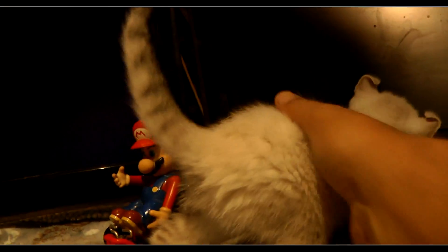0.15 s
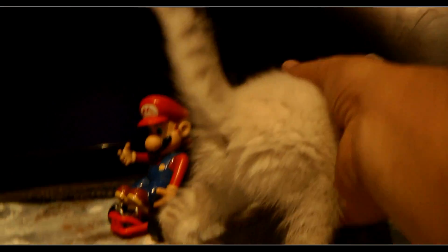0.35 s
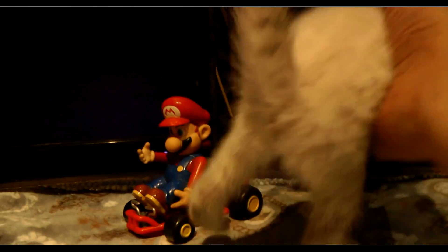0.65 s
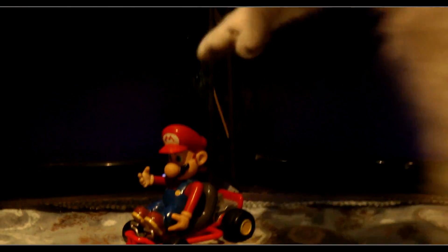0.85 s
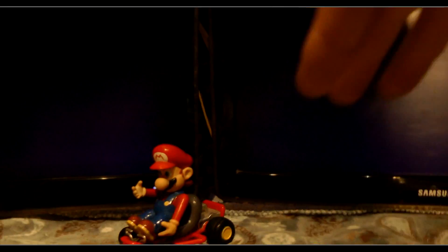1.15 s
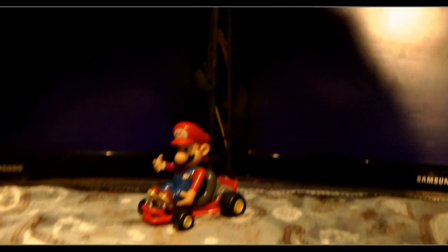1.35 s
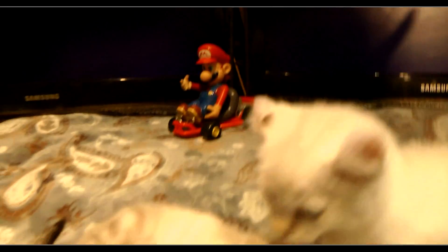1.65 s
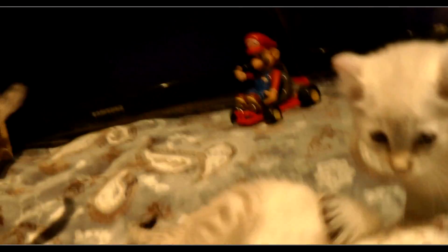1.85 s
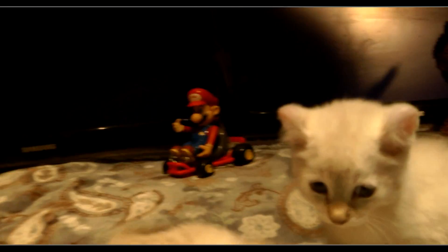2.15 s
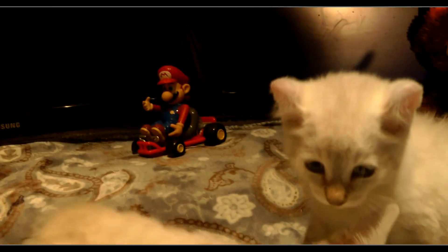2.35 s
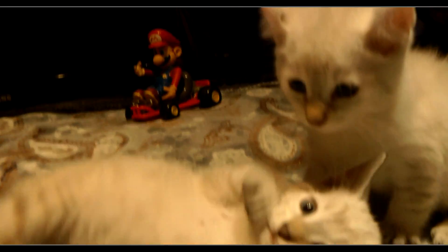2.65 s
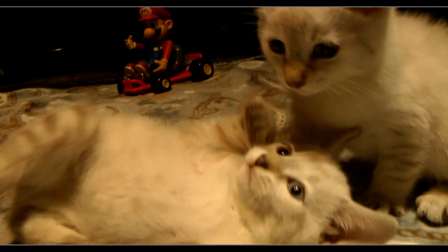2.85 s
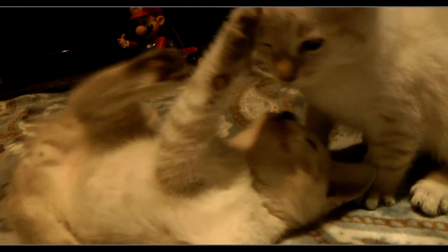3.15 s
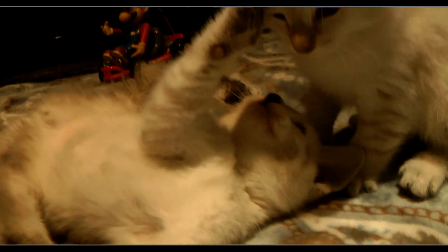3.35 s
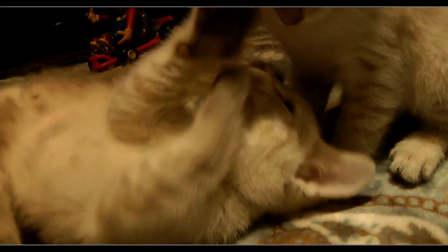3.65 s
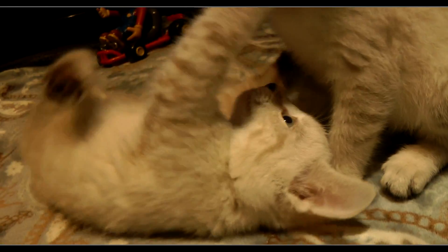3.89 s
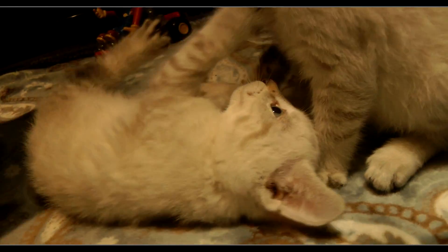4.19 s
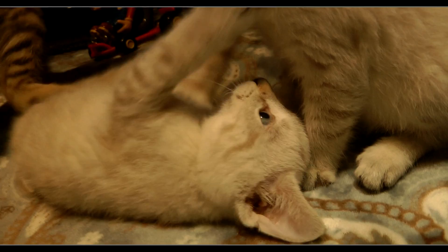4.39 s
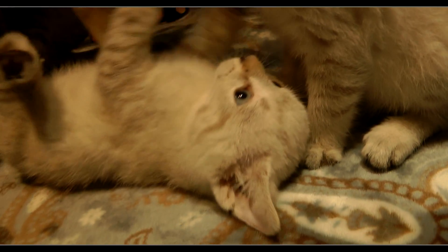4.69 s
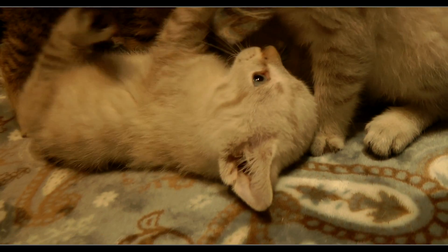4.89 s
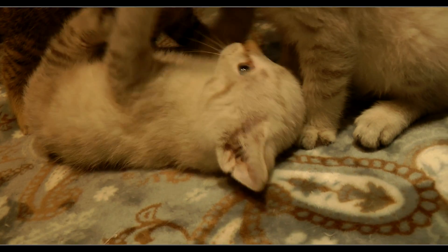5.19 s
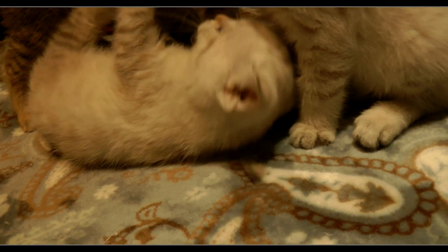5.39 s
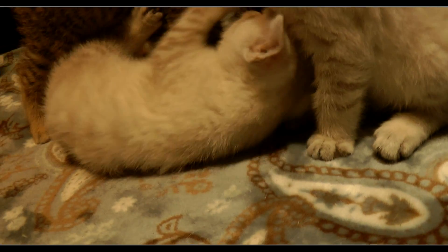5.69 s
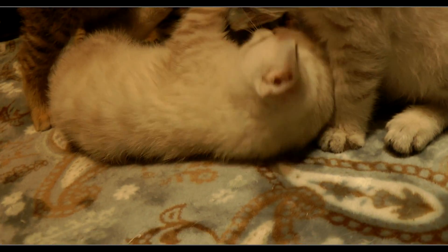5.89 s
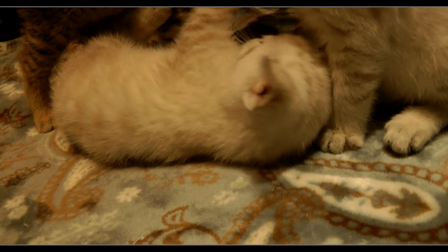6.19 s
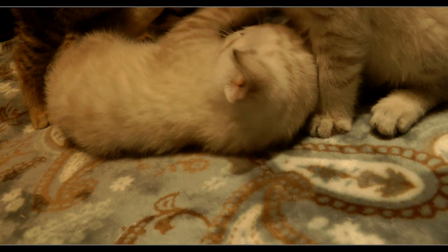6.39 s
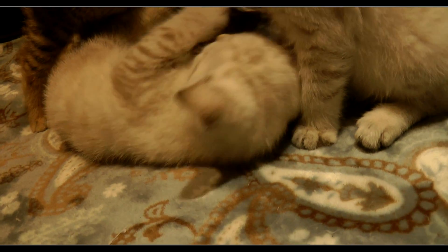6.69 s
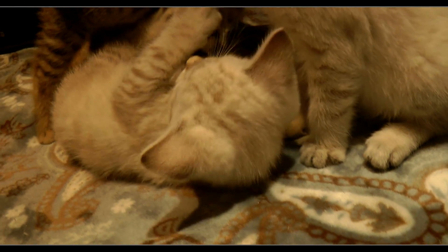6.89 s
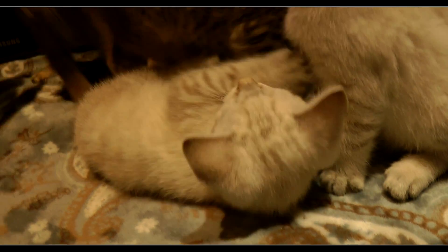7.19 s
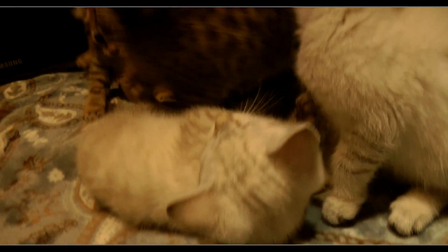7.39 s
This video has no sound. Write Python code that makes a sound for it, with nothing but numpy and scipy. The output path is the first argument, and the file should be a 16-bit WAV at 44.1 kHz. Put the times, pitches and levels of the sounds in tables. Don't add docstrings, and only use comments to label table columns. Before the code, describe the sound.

Kittens tumble on a soft bed cover. Light bumps of fingers on the device, a heavy low thud and quick hollow taps open it; then fur drags and rustles over cloth with padded shoves. Quieter scuffs lead to a sudden loud pat with claws catching threads, smaller thumps, and a final bright scratchy flurry. The stereo is wide and phasey, with low room hiss.

```python
import sys
import numpy as np
from scipy import signal
from scipy.fft import rfft, irfft, next_fast_len
from scipy.io import wavfile
from scipy.ndimage import uniform_filter1d

SR = 44100
rng = np.random.default_rng(int(sys.argv[2]) if len(sys.argv) > 2 else 0)


def gain_from_db(level_db):
    decades = np.asarray(level_db, float) / 20
    return 10 ** decades


def generate_wav(signal):
    frames = np.transpose(np.atleast_2d(signal))
    scaled = np.clip(frames, -1, 1) * 32767
    pcm = np.round(scaled).astype(np.int16)
    wavfile.write(sys.argv[1], SR, pcm)


N = 332514
T = np.arange(N) / SR


def unit(x):
    return x / np.sqrt(np.mean(x ** 2))


def band(x, lo_hz, hi_hz, order=2):
    return signal.sosfilt(signal.butter(order, [lo_hz, hi_hz], "band", fs=SR, output="sos"), x)


def low(x, hz):
    return signal.sosfiltfilt(signal.ellip(8, .2, 40, hz, fs=SR, output="sos"), x)


def walk(rate_hz):
    hold = int(SR / rate_hz)
    levels = rng.standard_normal(N // hold + 1)
    return uniform_filter1d(np.repeat(levels, hold), hold)[:N]


def add(out, start_s, x, peak_db):
    i = int(start_s * SR)
    x = x[:N - i]
    out[i:i + len(x)] += gain_from_db(peak_db) * x / np.max(np.abs(x))


def blow(hz, width, t60_s, rise_s, rough, size, snap=0.):
    t = np.arange(size) / SR
    attack = 1 - np.exp(-t / rise_s)
    decay = np.exp(-np.log(1000) * t / max(t60_s, .01))
    envelope = attack * decay * (1 + snap * np.exp(-t / 0.0017))
    wobble = unit(band(rng.standard_normal(size), hz / (1 + width), hz * (1 + width)))
    return envelope * (np.sin(2 * np.pi * hz * t) + rough * wobble)


def room_tone():
    # (relative, per Hz)
    hiss_spectrum = [(15, -45), (25, -7), (71, -10.5), (178, -2.5), (250, -2.5), (325, -2.5), (370, -4),
                     (494, -5.5), (548, -5), (609, -4), (1000, -4.5), (1300, -7), (1560, -8), (10800, -19),
                     (13000, -24.5)]
    # frequency_hz, level_db
    fan_lines = [
        (1018, -72),
        (180, -85),
    ]
    hz, db = np.transpose(hiss_spectrum)
    shape = gain_from_db(np.interp(np.log(np.fft.rfftfreq(N, 1 / SR) + 1), np.log(hz), db))
    waver = gain_from_db(.6 * walk(3))
    hiss = unit(irfft(rfft(rng.standard_normal(N)) * shape, N)) * gain_from_db(-54.5) * waver
    cavity = unit(band(rng.standard_normal(N), 4650, 7640)) * gain_from_db(-64.5)
    fan = sum(gain_from_db(db + 3.9 * walk(3.16)) * np.sin(2 * np.pi * f * T) for f, db in fan_lines)
    return hiss + cavity + fan


def creaks():
    # start_s, length_s, pitch_hz, level_db
    frame_creaks = [
        (4.62, .42, 400, -60.5),
    ]
    out = np.zeros(N)
    for start_s, length_s, hz, db in frame_creaks:
        n = int(length_s * SR)
        friction = band(rng.standard_normal(n), 0.91 * hz, 1.05 * hz)
        add(out, start_s, friction * np.sqrt(np.hanning(n)), db + 9.0)
    return out


def motion():
    # start_s, cloth_db
    restlessness = [(0, -56), (.57, -60), (1.3, -61), (1.95, -58.5), (2.4, -56.5), (2.56, -53.5),
                    (3.0, -52.5), (3.36, -46.5), (3.63, -48.5), (3.95, -52), (4.2, -52), (4.45, -57.5),
                    (4.75, -52), (5.02, -58), (5.7, -59), (6.0, -53.5), (6.55, -51), (6.95, -61)]
    # start_s, length_s, level_db, brightness_db, mattress_weight_db
    fur_drags = [(3.256, 0.053, -48, -0.5, -4), (4.49, 0.036, -48.5, -4, -11), (1.303, 0.11, -70, -12, 8),
                 (1.6, 0.076, -50.5, 5.5, -20), (1.721, 0.055, -49, 11, -5.5), (1.828, 0.07, -49.5, 2, -10),
                 (3.032, 0.13, -48, -3.5, -20), (3.153, 0.11, -40, -2.5, -12), (3.435, 0.093, -50.5, 0, -6),
                 (3.635, 0.048, -57.5, 8.5, -14), (3.967, 0.049, -46.5, -5.5, -26),
                 (4.206, 0.022, -60, 12, -18), (4.546, .05, -61.5, 8.5, 0), (4.825, .03, -61, 13, -15),
                 (4.913, 0.024, -49.5, 3.5, -4), (5.205, 0.08, -51, 7, 1), (5.659, 0.015, -53.5, 8, -9),
                 (5.8, 0.092, -53, 14.5, 6), (5.78, .015, -52, 11, 0), (5.943, 0.056, -45, -5, -7),
                 (6.635, 0.1, -51, -7, -1), (6.765, 0.025, -52, 4.5, 5), (7.267, 0.016, -57, 17.5, -4),
                 (7.346, 0.13, -62.5, 12, 1.5), (7.482, .05, -59, -2, -4)]
    attack_s, release_s = 0.018, 0.026
    t = T[::44]
    offsets_db = np.array([[0], [-8], [-10.5]])
    power = gain_from_db(np.interp(t, *np.transpose(restlessness)) + offsets_db) ** 2
    for start_s, length_s, db, bright_db, weight_db in fur_drags:
        swell = np.clip((t - start_s) / attack_s, 0, 1)
        release = np.exp(-np.clip(t - start_s - length_s, 0, None) / release_s)
        levels = gain_from_db(db + np.array([[0], [bright_db], [weight_db]]))
        power = power + (levels * swell * release) ** 2
    return [np.interp(T, t, np.sqrt(p)) for p in power]


def rustle(close):
    body, bright, weight = motion()
    chance = rng.random((2, N))
    happens = chance[0] < 2500 / SR
    size = gain_from_db(1.6 * -np.log(chance[1] + 0.018))
    slips = happens * size * np.sign(rng.standard_normal(N))
    slips = (unit(slips) + 0.82 * rng.standard_normal(N)) * gain_from_db(2.6 * walk(40))
    cloth = unit(band(slips, 307, 2300)) * body * gain_from_db(-3.0)
    fibres = (1 - close) * unit(band(slips, 3200, 6000, order=1)) * bright * gain_from_db(-2.5)
    press = unit(band(rng.standard_normal(N), 110, 288)) * weight * gain_from_db(1.04 * walk(15))
    skin = close * unit(band(slips, 3460, 10600)) * bright * gain_from_db(-4.5)
    return cloth + fibres + skin + press


def thumps():
    # start_s, peak_db, pitch_hz, t60_s
    body_drops = [(.539, -54, 131.5, 0.55), (1.202, -15.5, 180.4, 0.053), (1.221, -24, 180, 0.09),
                  (1.203, -32.5, 99, 0.16), (1.204, -29, 310, .05), (4.82, -38, 87, .15),
                  (7.3, -48, 72, .2), (3.73, -47, 340, 0.055), (3.766, -46, 250, .06),
                  (1.281, -37, 128, 0.27), (1.618, -50, 92, 0.085), (1.744, -41.5, 110, 0.15),
                  (2.04, -58, 183, 0.17), (3.49, -41, 257, 0.28), (3.859, -41, 126, 0.075),
                  (3.981, -33.5, 180.4, 0.16), (4.562, -45, 127, 0.12), (4.815, -30, 128, 0.11),
                  (6.514, -36.5, 181, 0.25), (3.983, -28.5, 486, 0.055), (6.519, -27.5, 486, 0.099),
                  (1.204, -28, 595, 0.04)]
    # start_s, peak_db, pitch_hz, padding_db
    limb_shoves = [(.059, -52, 182, 9), (.618, -49, 251, 4.5), (0.807, -53, 260, 0),
                   (1.835, -48.5, 253, 8.5), (2.498, -44.5, 139, 10.5), (3.159, -34.5, 257, 8),
                   (3.221, -33.5, 245, -2), (3.379, -47, 267, 2), (3.613, -38.5, 263, -0.5),
                   (3.819, -42, 218, 5.5), (5.221, -48, 145, -12), (5.768, -29, 122, 4.5),
                   (5.855, -32, 121.5, 9.5), (5.883, -32.5, 251, 10.5), (5.95, -44, 154, 9.5),
                   (6.363, -51.5, 247, 10), (6.679, -55, 260, -4), (6.695, -43.5, 133, -3),
                   (6.792, -46, 190, 6.5), (7.236, -41.5, 102, 2), (7.276, -37, 123, 10.5),
                   (7.339, -54, 180, 25), (.28, -54, 121, -8)]
    drop_padding_db, shove_t60_s = -25, 0.16
    weights = [(s, db, hz, drop_padding_db, t60_s) for s, db, hz, t60_s in body_drops]
    weights += [(*row, shove_t60_s) for row in limb_shoves]
    out = np.zeros(N)
    for start_s, db, hz, padding_db, t60_s in weights:
        mattress = blow(hz, 0.51, t60_s, min(0.0072, 0.07 * t60_s), 0.36, size=16000)
        add(out, start_s, mattress, db + 1.5)
        add(out, start_s, blow(75., .3, 1.1 * t60_s, .008, 1.5, size=16000), db - 22)
        padding = blow(341.5, 0.84, 0.54 * t60_s, 0.0016, 2.1, size=16000)
        add(out, start_s + 0.002944, padding, db + padding_db)
    return out


def ticks():
    # start_s, peak_db, pitch_hz, t60_s
    claw_ticks = [(3.1625, -30, 2100, 0.028), (3.1625, -34.5, 5200, .03), (3.331, -41, 1900, .03),
                  (3.981, -39, 1650, .03), (5.814, -31, 5600, .04), (5.8287, -23.5, 2800, .03),
                  (5.956, -27, 1500, 0.022), (6.666, -39, 1600, .03), (6.519, -36.5, 1970, 0.018),
                  (5.837, -26, 2200, .03), (5.852, -24, 1680, .03), (5.904, -33, 920, 0.028),
                  (5.964, -32, 2900, 0.027), (5.964, -35, 6000, .03), (7.29, -32, 3650, .025),
                  (7.29, -36, 7200, .025), (7.338, -22.5, 5100, .03), (7.339, -31, 6300, 0.028),
                  (7.342, -18, 2620, .03), (7.359, -32, 2400, .02), (7.3745, -23.5, 3300, .03),
                  (7.367, -38, 9000, 0.018), (7.29, -42, 10500, .02), (7.383, -36, 2000, .03),
                  (1.299, -50, 7400, .03)]
    out = np.zeros(N)
    for start_s, db, hz, t60_s in claw_ticks:
        add(out, start_s, blow(hz, 0.13, t60_s, 0.0005, 1.13, size=2500), db)
    return out


def taps():
    # start_s, peak_db, pitch_hz, crack_db
    pats = [(.062, -50, 492, -13), (.292, -31.5, 900, -37), (.542, -39, 862, -4.5), (.625, -31, 666, -14),
            (.819, -47, 520, -17), (1.212, -36, 678, -20), (1.746, -26, 1400, -20), (1.737, -33, 1400, -14),
            (1.791, -32.5, 893, -12), (1.633, -35, 595, -15), (1.845, -31, 1300, -20),
            (1.616, -38, 1210, -20), (1.75, -20.5, 780, -33), (1.758, -21.5, 1400, -18),
            (1.83, -17.5, 1450, -27), (2.498, -34, 707, -9.5), (2.519, -36, 1220, -5.5),
            (2.652, -45, 503, -15), (3.329, -41, 1050, -7), (3.383, -36.5, 475, -12),
            (3.491, -28.5, 560, -10), (3.5, -34, 1090, -10), (3.916, -33, 1230, -15),
            (3.921, -34.5, 724, -16), (3.984, -36, 526, -7), (4.812, -29, 960, -10),
            (5.764, -19, 1025, -14), (5.757, -36, 1500, -1), (5.77, -10.5, 746, -22),
            (5.771, -17, 1090, -20), (6.371, -46, 440, -15), (6.548, -36, 466, -18), (6.558, -34, 850, -15),
            (6.663, -36, 462, -9), (7.27, -26.5, 1950, -5), (7.274, -19.5, 975, -8.5),
            (7.342, -16, 990, -9), (5.773, -18, 590, -23)]
    # start_s, peak_db, pitch_hz, crack_db
    skids = [(.619, -43, 1090, 3.5), (1.214, -40, 460, -2.5), (1.632, -24, 1250, -9),
             (1.735, -38, 1410, -9), (1.782, -31, 1430, -7), (1.831, -23.5, 570, -26),
             (2.015, -50, 1440, -18), (2.046, -44, 742, -14), (3.162, -26.5, 386, -3),
             (3.17, -25.5, 1122, -3), (3.259, -34.5, 687, -1), (3.609, -34.5, 710, -3),
             (3.819, -37.5, 520, -9), (5.79, -25, 1240, -14), (5.83, -26, 690, -1), (5.853, -17.5, 740, -7),
             (5.861, -26, 900, -5), (5.883, -19.5, 742, -7), (5.894, -30, 900, -4),
             (5.956, -24.5, 1500, -5.5), (6.517, -30, 555, -11), (6.634, -40, 614, -9),
             (6.688, -38, 580, -25), (6.781, -35, 394, -16), (6.793, -38.5, 500, -0.5),
             (7.232, -35, 1085, -6), (7.289, -32, 810, -2), (7.338, -18, 1070, -3),
             (7.3375, -17.5, 1640, -3), (7.3675, -21, 950, -3)]
    # start_s, peak_db, pitch_hz, crack_db, scratch_db
    swipes = [(0.212, -47.5, 503, -12, -7.5), (1.299, -62, 710, 5, -2), (1.615, -42, 1520, -20, 0),
              (1.771, -22.5, 1330, -18, -12), (1.766, -22, 740, -18, -14), (2.816, -40.5, 590, -22, -6.5),
              (3.137, -37.5, 880, 0.5, -2.5), (3.226, -35, 480, -7, -9), (3.649, -32, 1025, -3, -6),
              (4.227, -45.5, 1360, 4, 6), (4.581, -48, 1720, 7.5, -4.5), (4.839, -45.5, 1190, 2, 0.5),
              (4.924, -49, 387, 8.5, 8.5), (5.22, -45.5, 1200, 0, 4), (5.239, -40.5, 610, -3, -3),
              (5.262, -39.5, 593, -4, 0), (5.44, -48, 1430, 0.5, 0.5), (5.689, -45, 1390, 0, -2.5),
              (5.82, -33, 1200, -5, -0.5), (6.018, -39, 1820, -3, -3), (6.138, -45.5, 530, -14, -2.5),
              (7.375, -36, 930, 1, -2), (7.499, -45.5, 711, 5, 4.5), (4.812, -31, 2000, -19, -9)]
    contacts = [(*row, -24.5, 0.065) for row in pats]
    contacts += [(*row, -9.5, 0.054) for row in skids]
    contacts += [(*row, 0.04) for row in swipes]
    out = np.zeros(N)
    for start_s, db, hz, crack_db, scratch_db, usual_t60_s in contacts:
        firmness = np.exp(-0.05 * (db + 33.5))
        t60_s = usual_t60_s * firmness * (800 / hz) ** 0.13
        swipe = np.clip((scratch_db + 6) / 8, 0, 1)
        rise_s, snap = 0.0004 + 0.011 * swipe, 1.6 * (1 - swipe)
        early_s = start_s - .0005 - .008 * swipe
        ring = blow(hz, 0.18, t60_s, 0.00082, 0.77 * (hz / 1000), size=8000, snap=.5 * snap)
        knock = blow(1220.0, 0.43, 1.5 * t60_s, 0.0012, 6.5, size=8000)
        crack = blow(2500., 0.46, 2.24 * t60_s, rise_s, 5.8, size=8000, snap=snap)
        scratch = blow(5300., 0.28, 2.04 * t60_s, rise_s, 2.2, size=8000, snap=snap)
        add(out, start_s, ring, db - 2.5)
        add(out, start_s, knock, db - 10 + 0.38 * (crack_db + 14.5))
        add(out, early_s, crack, db + crack_db)
        add(out, early_s, scratch, db + scratch_db)
    return out


def reflections(x, t60_s, wet_db):
    t = np.arange(int(.4 * SR)) / SR
    tail = band(rng.standard_normal(len(t)), 270, 13800, order=1)
    tail = tail * np.exp(-np.log(1000) * t / t60_s) * (1 - np.exp(-t / 0.0041))
    return x + gain_from_db(wet_db) * signal.fftconvolve(x, tail / np.sqrt(np.sum(tail ** 2)))[:N]


def ports(x, table, smear_s, least):
    size = next_fast_len(N + SR)
    hz, *cols = np.transpose(table)
    at = np.log(np.fft.rfftfreq(size, 1 / SR) + 1)
    db, phase, like = (np.interp(at, np.log(hz), c) for c in cols)
    like, gain = np.clip(like, 0, 1), gain_from_db(db)
    n = int(8 * smear_s * SR)
    scatter = rng.standard_normal(n) * np.exp(-np.arange(n) / (smear_s * SR))
    scatter = np.exp(1j * np.angle(rfft(scatter, size)))
    left = gain * (like * np.exp(1j * phase) + np.sqrt(1 - like ** 2) * scatter)
    usual = np.sqrt(1 + gain ** 2 + 2 * gain * like * np.cos(phase))
    total = np.clip(np.abs(1 + left), least * usual, usual / least) * np.exp(1j * np.angle(1 + left))
    pair = np.array([left, np.ones_like(left)])
    return irfft(2 * rfft(x, size) / total * pair, size)[:, :N]


def scene():
    # time_s, front_share (0-1, bed in front; the rest is fingers behind)
    front_share = [
        (0, .2),
        (1.1, .2),
        (1.15, 1),
        (1.5, 1),
        (1.55, 0),
        (2.3, 0),
        (2.4, .9),
        (7.54, .9),
    ]
    # frequency_hz, left_minus_right_db, left_phase_rad, likeness (0-1)
    bed_ports = [(30, 3, -2., .6), (70, 8, -1.1, .98), (125, 5, -1., .99), (185, 1.5, -1.1, .99),
                 (270, -8, -1.6, .85), (380, -10, -3.6, .75), (550, -6, -4., .9), (1100, -4, -4.3, .85),
                 (2100, -5, -4.9, .75), (4200, -8, -5.2, .6), (6000, -10, -5.3, .55), (8000, -8, -5.8, .4)]
    room_ports = [(70.5, 0, -18, .5), (127.3, -5, -2.5, 1), (185, 3, -1.5, 0.39), (264, -4, -1, 1),
                  (380, 2, -3, 0.71), (540, 0.5, -3, 0.87), (1520, 0.5, -3, 0.83), (2180, -1.5, -3.5, 0.8),
                  (3080, -3.5, -3, 0.56), (4200, -6.5, -2.5, .35), (5900, -9.5, -0.5, .1),
                  (8050, -9, -56, 0.14)]
    hand_ports = [(70, 0, .5, .7), (270, -2, -2., .3), (550, -1, -3.5, .9), (1100, 0, -3.5, .88),
                  (2100, -3, -3.6, .55), (4200, -6, -4.2, .3), (6000, -10, -4.4, .35), (8000, -7, -4.4, .2)]
    front = np.clip(np.interp(T, *np.transpose(front_share)), 0, 1)
    mic_high_pass = signal.butter(3, 57.5, "high", fs=SR, output="sos")
    hits = low(taps(), 7030) + ticks() + signal.sosfilt(mic_high_pass, thumps())
    rubbing = rustle(1 - front) + creaks()
    bed = reflections(hits * front, 0.35, -12.5) + rubbing * front
    hand = reflections(hits * (1 - front), 0.39, -28.0) + rubbing * (1 - front)
    heard = ports(bed, bed_ports, 0.0079, 0.79) + ports(hand, hand_ports, 0.0053, 0.65)
    return heard + ports(room_tone(), room_ports, 0.094, 0.99)


def low_pass(x):
    return signal.sosfilt(signal.butter(12, 13350, fs=SR, output="sos"), x)


def record(dry):
    left_tops = (9350, 10300, 11400)
    right_tops = (11760, 12450, 13250)
    busy = uniform_filter1d(band(dry[1], 8000, 11500) ** 2, 1500)
    out = []
    for x, tops, steps_db in ((dry[0], left_tops, (10., 11.5)), (dry[1], right_tops, (3.5, 11.))):
        layers = [low(x, hz) for hz in tops]
        y = layers[0]
        for below, above, db in zip(layers, layers[1:], steps_db):
            is_open = busy > np.median(busy) * gain_from_db(db) ** 2
            gate = uniform_filter1d(1. * is_open, size=400)
            y = y + gate * (above - below)
        out.append(y)
    return low_pass(np.array(out))


dry = scene()
out = record(dry)
generate_wav(out)
```